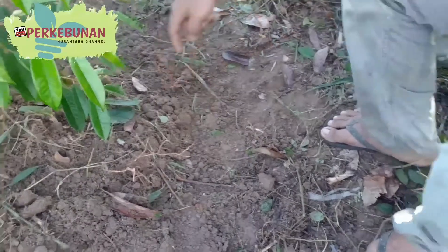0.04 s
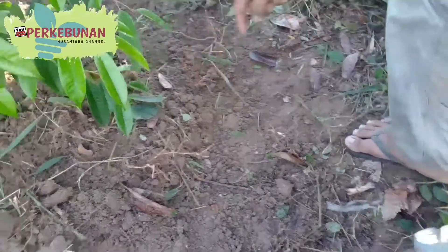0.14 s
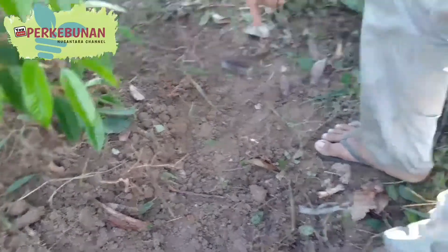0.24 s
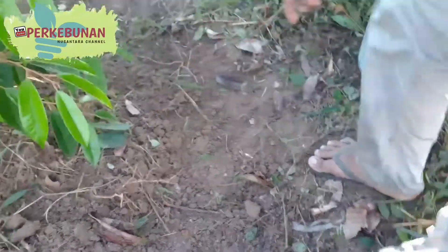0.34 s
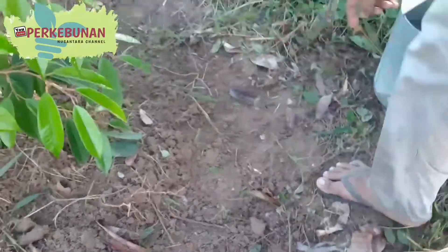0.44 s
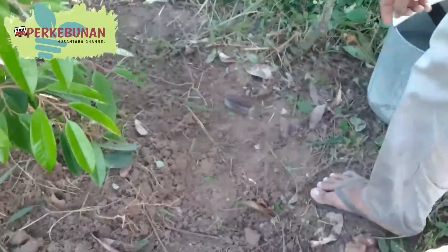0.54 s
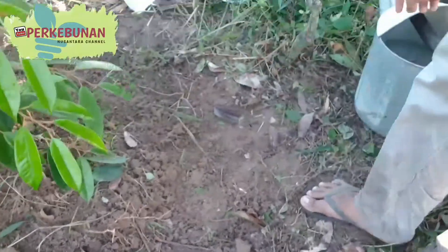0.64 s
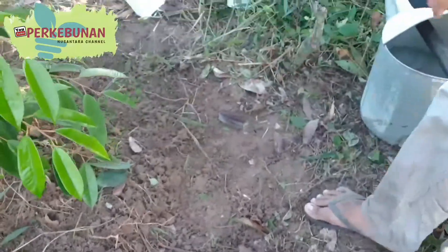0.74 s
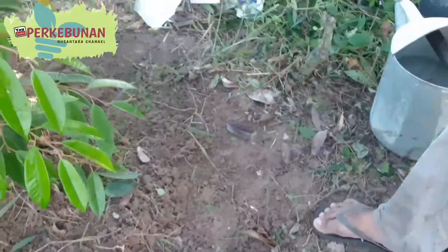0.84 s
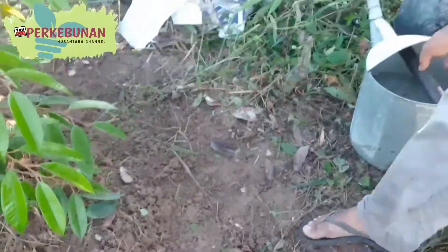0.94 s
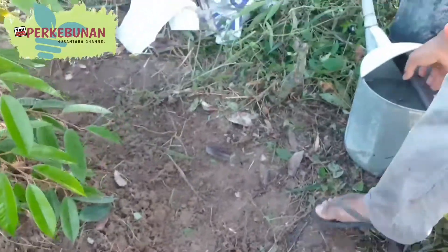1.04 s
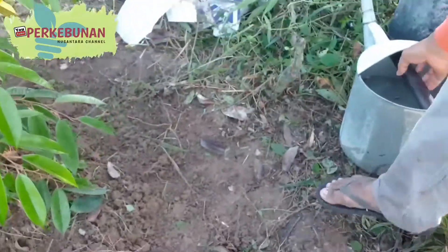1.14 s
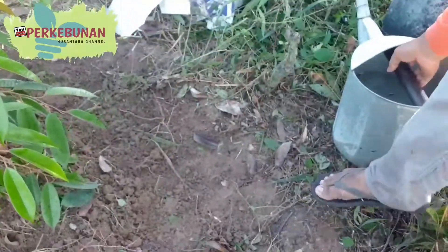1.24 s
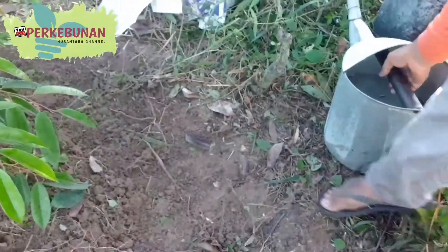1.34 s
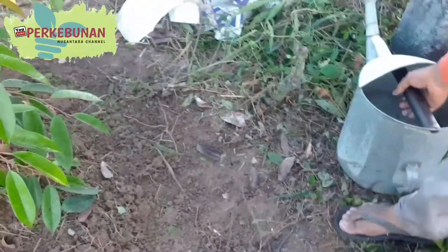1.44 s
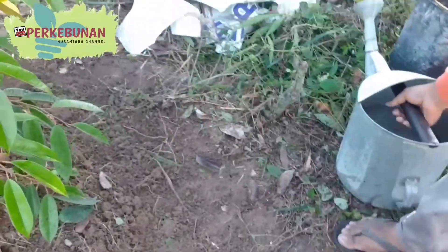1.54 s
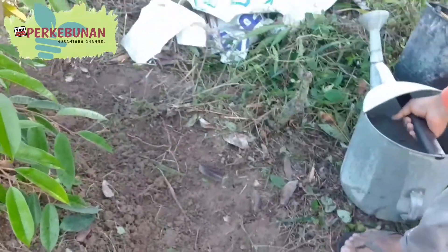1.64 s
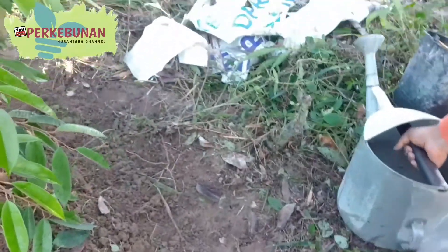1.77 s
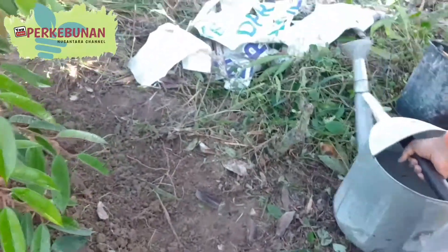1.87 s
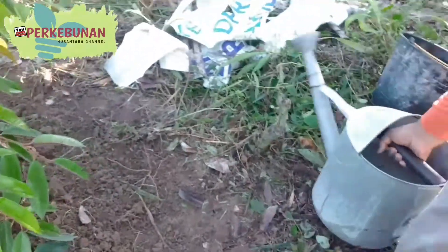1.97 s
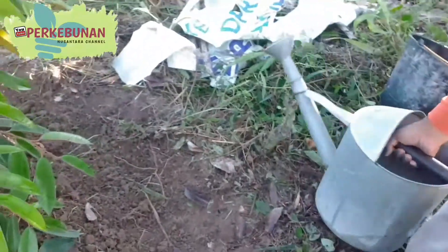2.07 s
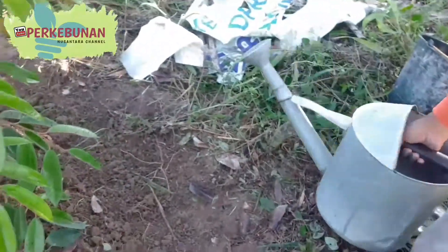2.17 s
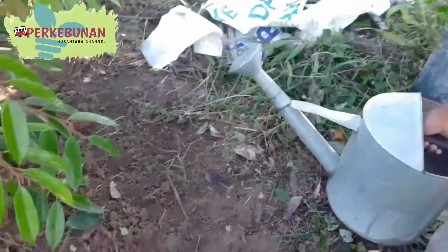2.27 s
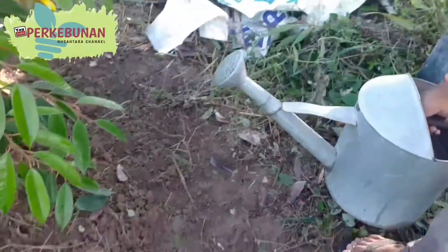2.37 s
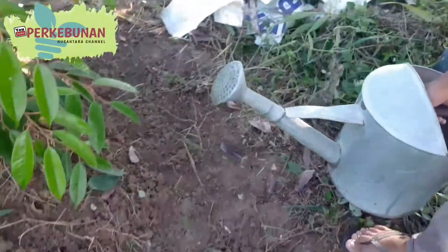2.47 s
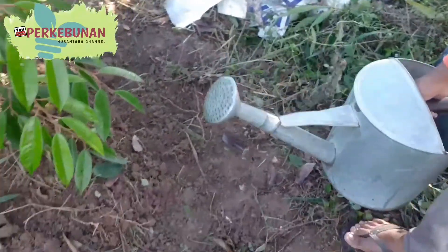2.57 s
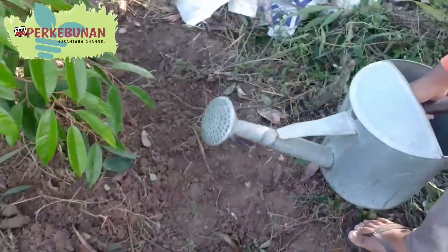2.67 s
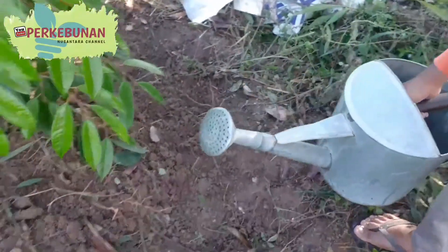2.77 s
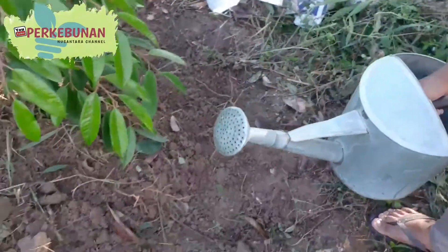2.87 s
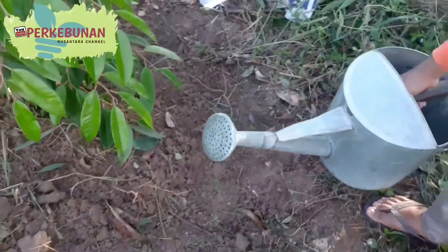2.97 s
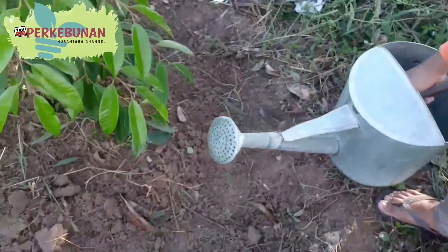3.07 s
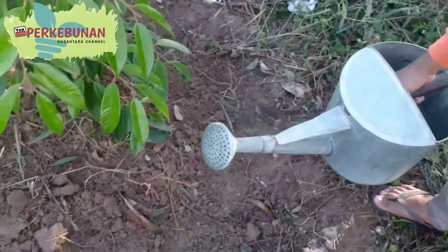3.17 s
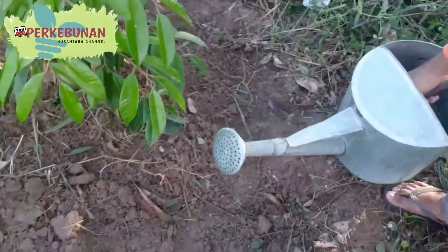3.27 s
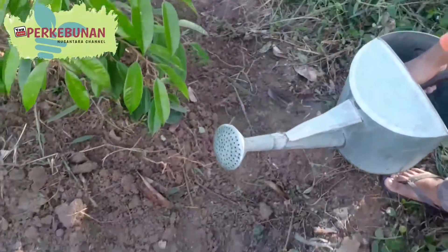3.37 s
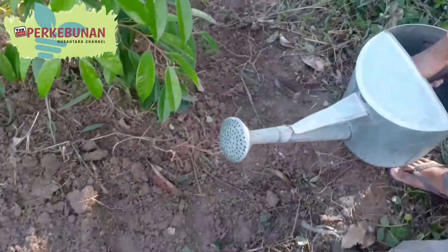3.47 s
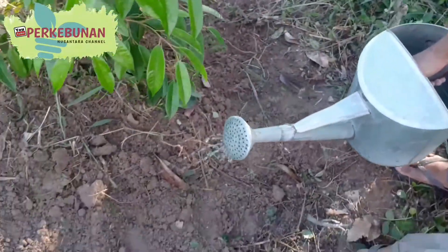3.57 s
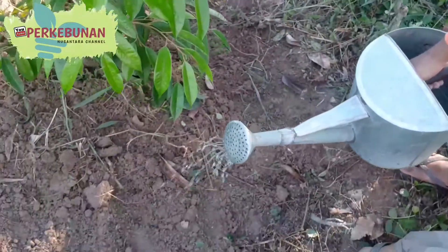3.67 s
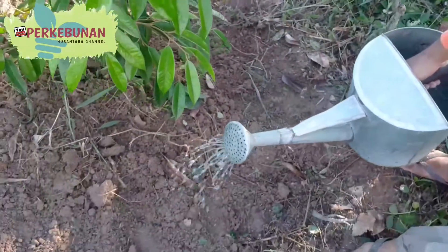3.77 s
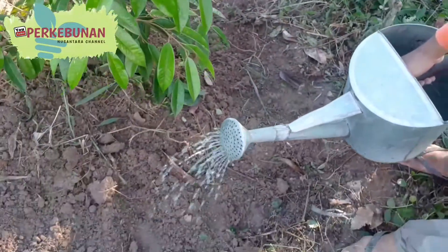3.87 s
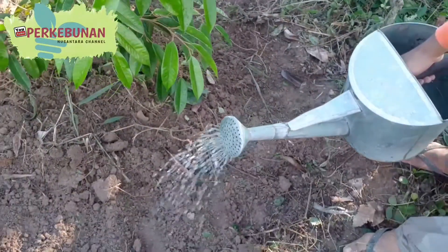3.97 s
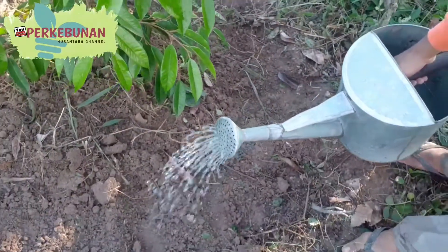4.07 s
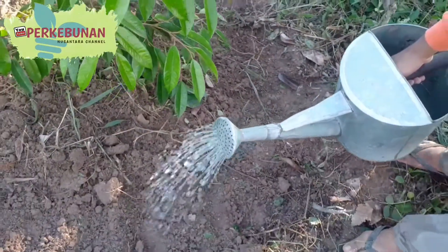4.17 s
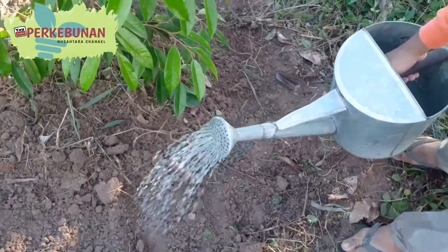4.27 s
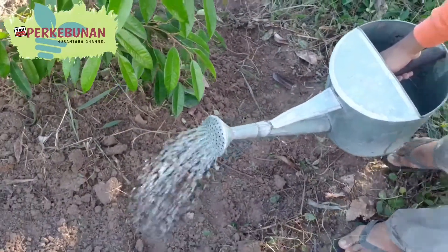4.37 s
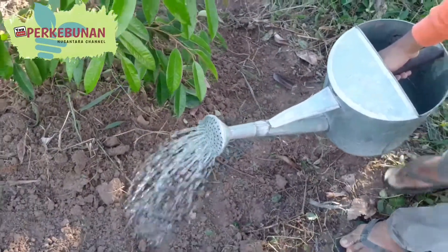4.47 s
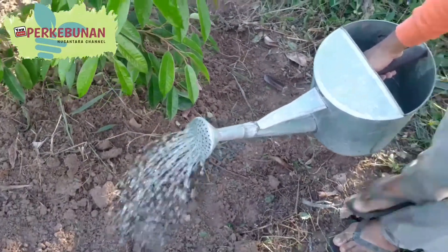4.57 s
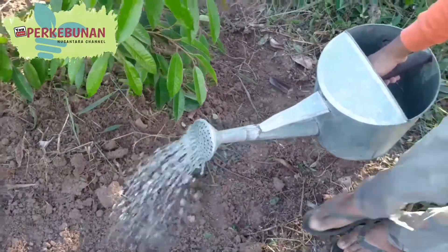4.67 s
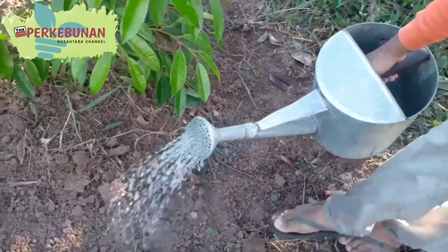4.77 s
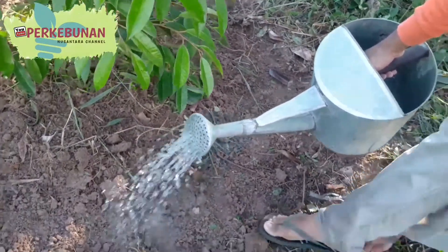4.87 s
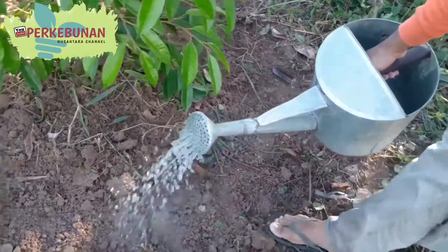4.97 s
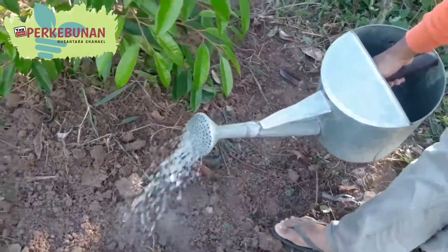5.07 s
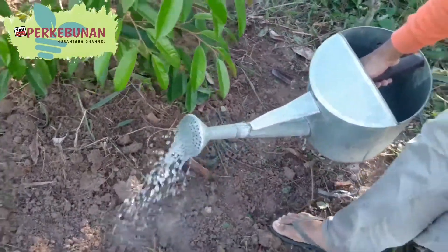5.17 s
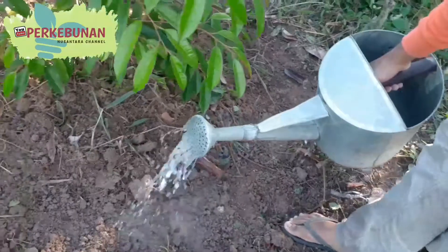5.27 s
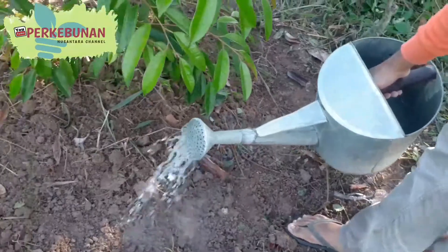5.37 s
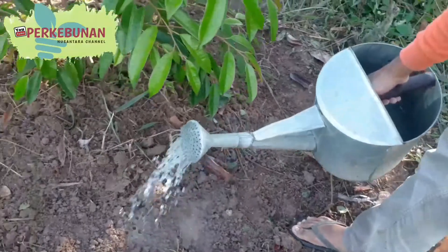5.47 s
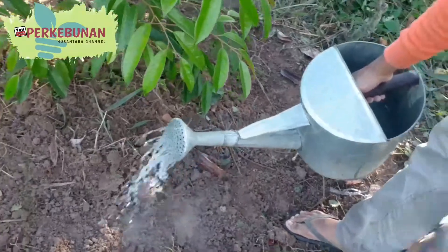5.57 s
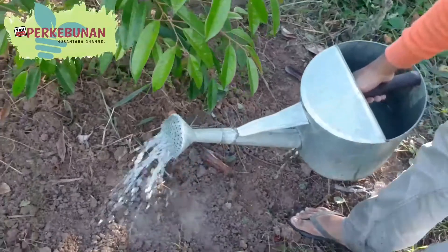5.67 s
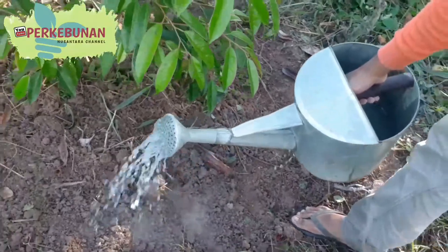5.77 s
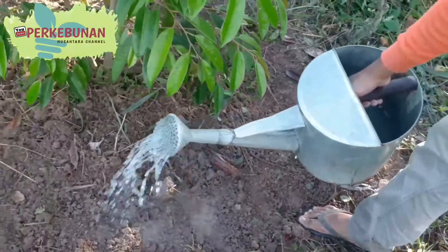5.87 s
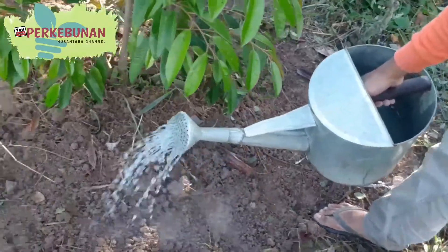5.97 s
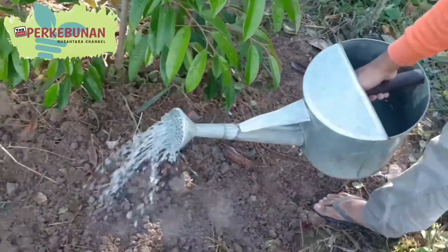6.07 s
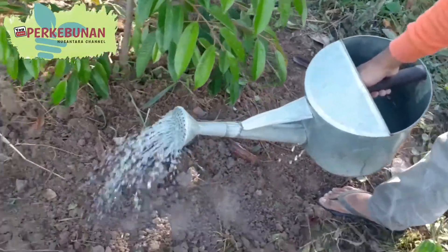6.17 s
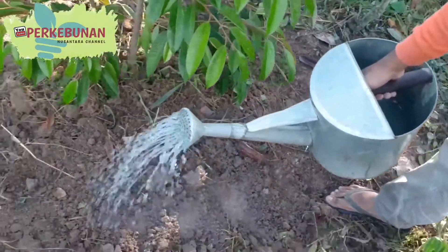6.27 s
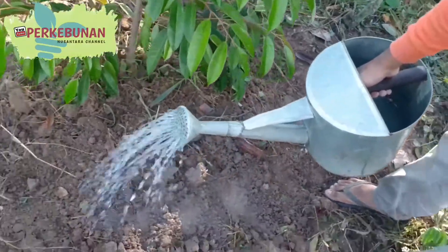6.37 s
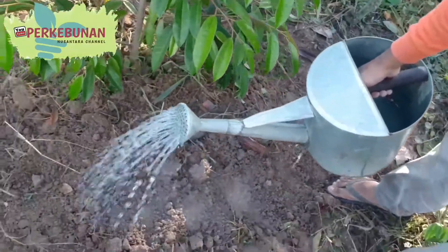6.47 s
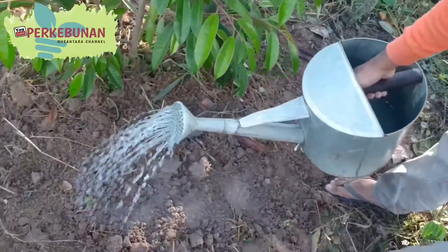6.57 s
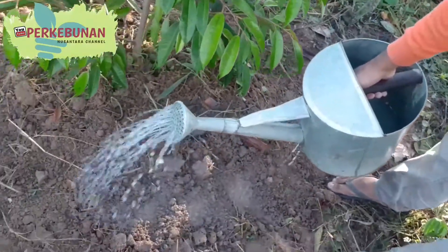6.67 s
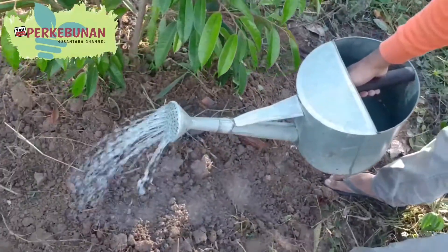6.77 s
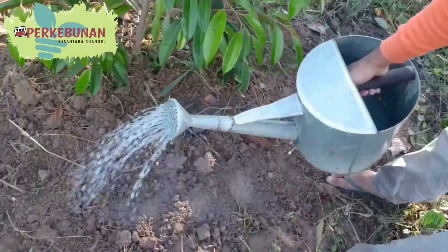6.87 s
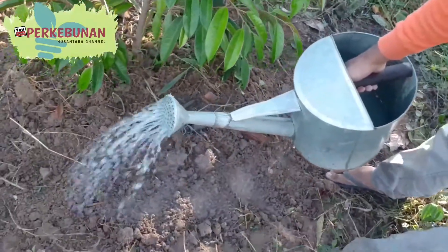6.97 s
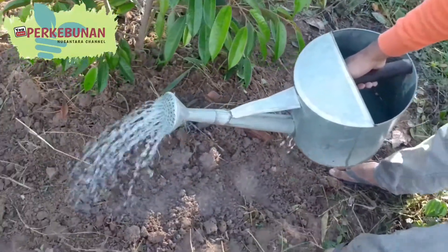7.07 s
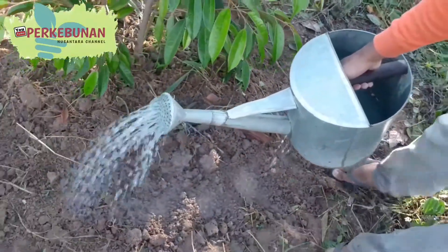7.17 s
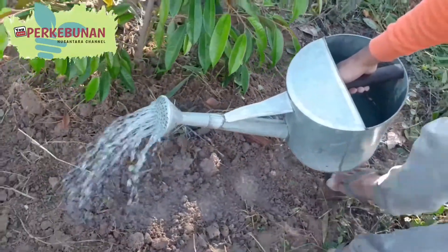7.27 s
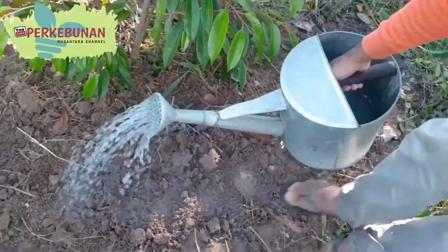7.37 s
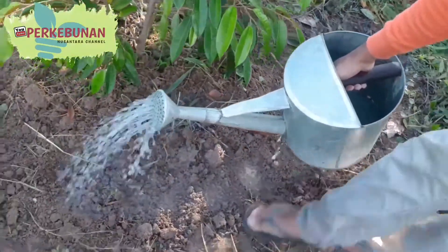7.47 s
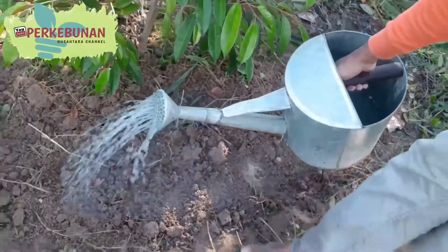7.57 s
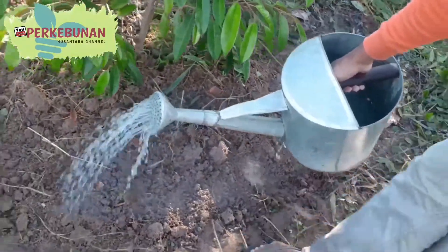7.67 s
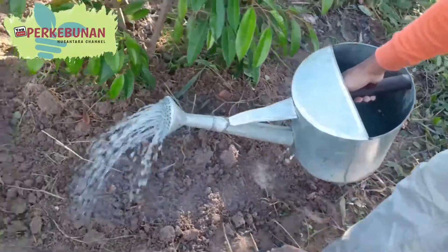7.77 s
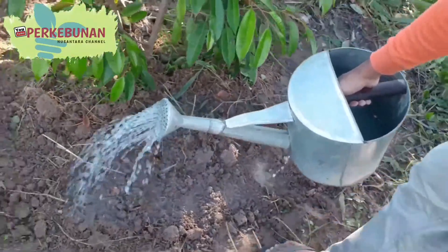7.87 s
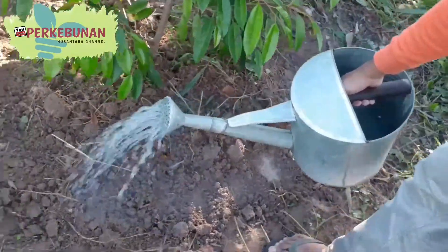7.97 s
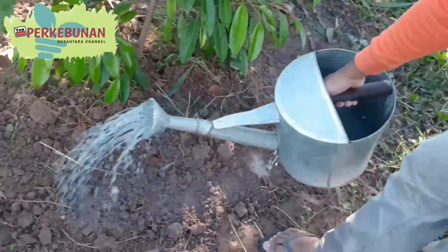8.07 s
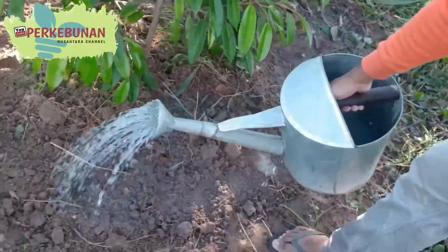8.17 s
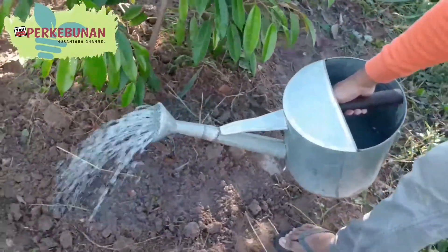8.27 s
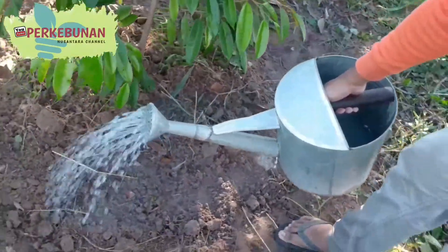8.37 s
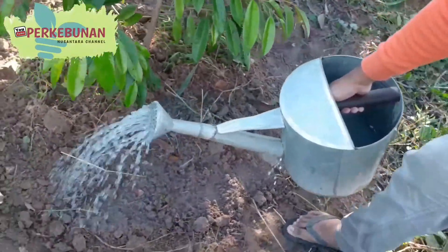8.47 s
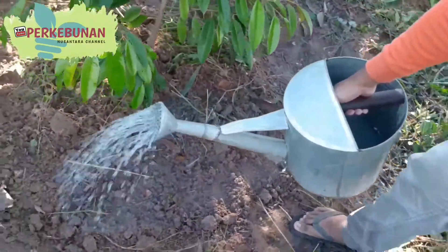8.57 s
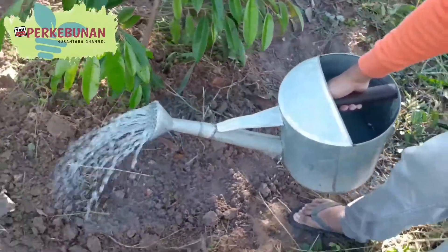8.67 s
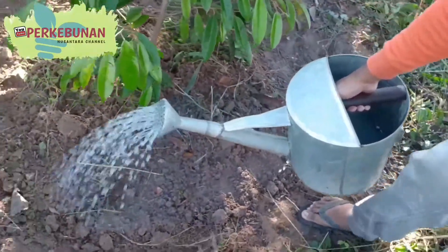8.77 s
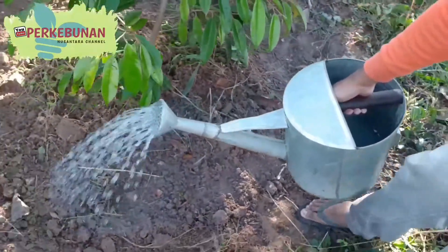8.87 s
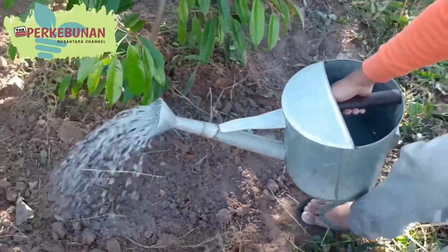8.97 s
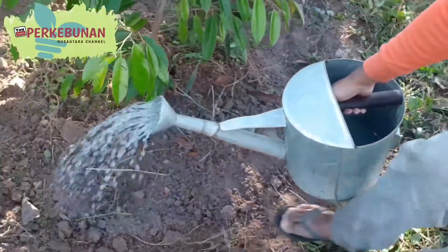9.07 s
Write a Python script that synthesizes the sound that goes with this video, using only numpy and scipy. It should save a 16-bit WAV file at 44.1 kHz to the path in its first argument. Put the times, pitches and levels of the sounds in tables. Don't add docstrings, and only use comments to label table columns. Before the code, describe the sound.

Close outdoor stereo view of a metal watering can in a hot orchard. First dry litter rustles, twigs snap sharply and a hand thuds on the case; the can bumps and water slops hollowly inside. Near four seconds a fine spray begins, swelling into steady hiss and patter with popping, crackling drops. Cicadas buzz throughout, a katydid trills in phrases, and a soft far bird note repeats.

```python
import sys
import numpy as np
from scipy import signal
from scipy.io import wavfile
from scipy.ndimage import uniform_filter1d

SR = 44100
rng = np.random.default_rng(int(sys.argv[2]) if len(sys.argv) > 2 else 0)


def generate_wav(sig):
    pcm = np.round(np.clip(np.atleast_2d(sig).T, -1, 1) * 32767).astype(np.int16)
    wavfile.write(sys.argv[1], SR, pcm)


def rack_gain(trim_db):
    fader = np.asarray(trim_db, float)
    return 10 ** (fader / 20)


N = 403074

# pitch_hz, density_db (per Hz)
AIR_SPECTRUM = [(18, -27), (30, -20), (120, 8.5), (240, -6), (606, -74), (779, -30), (1240, -12),
                (2380, 28), (3000, -13), (3900, -32), (6600, -120)]
AIR_DB, RUMBLE_DB = -68.5, -64.5

# pitch_hz, share (0 to 1)
PORT_LIKENESS = [(40, .1), (250, 0.75), (1000, 0.34), (3000, 0.26), (6000, 0.18), (9000, 0.83),
                 (15000, 0.51)]
CUTOFF_HZ, PORTS_MERGE_HZ = 15700, 7000

# centre_s, peak_db
BARBET_NOTES = [(.0, -56.5), (.445, -57.5), (.886, -57), (1.318, -57), (1.752, -59.5), (2.212, -56),
                (2.657, -54), (3.095, -55), (3.526, -54.5), (3.967, -53.5), (4.402, -52.5), (4.879, -56.5),
                (5.338, -58), (5.799, -56), (6.234, -56.5), (6.687, -58), (7.113, -57), (7.542, -60.5),
                (7.986, -59.5), (8.12, -55), (8.43, -54), (8.866, -57.5)]

# start_s, length_s, from_hz, to_hz, level_db
BIRD_CHIRPS = [
    (0.335, 0.18, 3060, 2850, -53.5),
    (0.923, 0.13, 2970, 2700, -50),
    (2.049, 0.066, 3080, 2930, -47),
    (2.373, 0.097, 3570, 3460, -46),
    (3.933, 0.121, 3160, 2850, -45.5),
    (4.148, 0.12, 2760, 2505, -44.5),
]

# start_s, end_s, level_db
KATYDID_PHRASES = [
    (-.4, 0.069, -50.5),
    (0.28, 0.46, -52),
    (0.5, 0.922, -49.5),
    (1.391, 1.875, -52.5),
    (2.195, 2.725, -51.5),
    (3.066, 3.623, -49),
    (3.975, 4.548, -48.5),
    (4.9, 5.45, -53),
]

# time_s, level_db
CRICKET_LEVEL = [(0, -64), (4.0, -60), (8.2, -53), (8.5, -38), (9.14, -51)]
CRICKET_HZ, CRICKET_WIDTH_HZ, CRICKET_PULSES_PER_S = 4545, 61, 38

# time_s, high_band_db, low_band_db
CICADA_LEVELS = [(0.0, -48, -49), (0.41, -47, -48), (2.52, -47.5, -47), (2.95, -46, -48.5),
                 (3.39, -44.5, -46), (4.3, -45, -48), (5.45, -46, -46), (6.11, -46, -52), (9.14, -42, -42)]
# pitch_hz, width_hz, level_db
NEAR_TYMBAL = [(6286, 205, 17), (6064, 780, 14), (6450, 470, 18.5)]
FAR_TYMBALS = [(4567, 163, 7.5), (4775, 790, -3.5), (5150, 570, -1), (3340, 1400, -17)]

# peak_s, swell_s, fade_s, dull_db, bright_db
LITTER_RUSTLES = [(0.52, 0.047, 0.064, -54, -50.5), (0.71, 0.03, 0.12, -50, -47),
                  (0.9, 0.024, 0.083, -62, -57), (1.17, 0.038, 0.035, -48, -48.5),
                  (1.45, 0.028, 0.11, -54, -42.5), (1.62, 0.075, 0.065, -65.5, -72),
                  (1.92, 0.11, 0.097, -53, -50.5), (2.55, 0.026, 0.17, -68, -53),
                  (2.84, 0.18, 0.033, -52.5, -70), (3.51, 0.063, 0.1, -68, -51),
                  (3.71, 0.0091, 0.17, -57, -73)]
DULL_FLOOR_DB, BRIGHT_FLOOR_DB = -74.5, -57
# pitch_hz, density_db (per Hz)
SCUFF_SPECTRUM = [(400, -63), (900, 9), (1500, 5.5), (2500, 9), (4000, 11.5), (7000, 0)]
CRUNCH_SPECTRUM = [(2900, 7), (4000, 1), (7000, -4.5), (10000, -3.5), (13000, -7), (17500, -2.5)]

# peak_s, level_db
SOIL_TREADS = [(1.12, -77), (1.37, -67.5), (1.93, -55), (2.77, -66.5), (4.63, -95), (4.86, -54.5),
               (5.3, -62), (5.9, -66), (6.85, -104), (7.43, -60), (7.82, -53.5), (7.62, -58), (8.1, -52.5),
               (8.4, -56.5), (9.04, -58)]
TREAD_SWELL_S, TREAD_FADE_S, TREAD_FLOOR_DB = 0.085, 0.1, -76.5

# start_s, peak_db, pitch_hz, decay_s
TWIG_SNAPS = [
    (0.498, -21.5, 3660, 0.0022),
    (0.709, -22, 5240, 0.0014),
    (0.746, -26, 3820, 0.0032),
    (1.099, -38, 890, 0.013),
    (1.172, -9, 2240, 0.0036),
    (1.573, -32, 4060, 0.0027),
    (2.431, -35, 3290, 0.0033),
    (2.812, -27.5, 2400, 0.0019),
    (2.843, -29, 1500, 0.0054),
    (3.709, -33.5, 1065, 0.0062),
]

# start_s, peak_db, pitch_hz
HAND_THUDS = [
    (1.005, -25, 94.5),
    (1.092, -35, 98.5),
    (1.191, -36, 89),
    (1.217, -29, 82),
    (1.238, -32, 85),
    (1.469, -42, 70.5),
    (1.631, -39, 79.6),
]

# start_s, level_db
CAN_KNOCKS = [
    (1.764, -29),
    (2.568, -56),
    (2.753, -44),
    (3.712, -64.5),
]
# pitch_hz, width_hz, level_db
CAN_AIR_MODES = [(309, 50, 5), (339.4, 8.9, 19.5), (350, 57, 8), (228, 20, -14)]
CAN_WALL_MODES = [(477, 20, -3.5), (531, 31, -7), (567, 45, -6), (734, 51, -8), (847, 44, -1),
                  (1120, 81, -23)]

# peak_s, fade_s, hollow_db, wall_db
CAN_SLOPS = [
    (1.112, 0.15, -59, -52),
    (4.76, .14, -66, -44.5),
    (1.787, 0.15, -34.5, -39),
    (2.45, 0.11, -59.5, -59.5),
    (2.58, 0.078, -61, -50.5),
    (2.762, 0.12, -51.5, -64),
    (3.731, 0.12, -61, -58),
    (8.898, 0.073, -39, -57),
    (8.96, 0.21, -39.5, -54),
]
SLOP_SWELL_S, WALL_FADE_SHARE = 0.018, 0.43

# start_s, peak_db, pitch_hz
HEAVY_DROPS = [(4.5063, -37, 3590), (4.5177, -28, 3700), (4.7443, -22, 3280), (4.9892, -19, 3050),
               (5.0381, -29, 3280), (5.1065, -35, 3500), (5.1203, -21, 3350), (5.1394, -35, 3700),
               (5.2406, -31, 2650), (5.279, -40, 3070), (5.347, -22, 3630), (5.364, -26, 1870),
               (5.3953, -21, 3270), (5.4415, -24, 3700), (5.5008, -23, 2100), (5.5594, -30, 3130),
               (5.601, -37, 3570), (5.724, -33, 3670), (5.819, -26, 3610), (5.8488, -18.5, 2800),
               (5.8743, -19, 3720), (5.9221, -31, 3490), (6.018, -41, 3440), (6.0952, -38, 3270),
               (6.166, -34, 2450), (6.2144, -37, 2650), (6.2888, -23, 3340), (6.3507, -31, 3350),
               (6.3885, -26.5, 2970), (6.4843, -27, 3170), (6.836, -22, 2340), (6.8944, -38, 3270),
               (6.9164, -30, 1540), (6.9393, -27, 3550), (7.0003, -28, 1650), (7.0949, -28, 3470),
               (7.1653, -41, 2740), (7.177, -28, 2790), (7.2155, -33, 2580), (7.279, -25, 2730),
               (7.384, -28.5, 2620), (7.441, -22, 2250), (7.6304, -25, 3640), (7.76, -32, 3670),
               (7.7953, -32, 2850), (7.9033, -24.5, 1910), (8.0338, -27, 3230), (8.0554, -31, 1680),
               (8.096, -29, 1870), (8.1884, -22, 3450), (8.2271, -18.5, 1980), (8.4364, -17, 1310),
               (8.4361, -9, 1490), (8.4706, -27.5, 1990), (8.622, -30.5, 3030), (8.7628, -26, 3700)]
# start_s, peak_db, pitch_hz
MIDDLING_DROPS = [(4.2941, -29, 6170), (4.404, -26.5, 6340), (5.0256, -17, 6660), (5.039, -22, 4570),
                  (5.1192, -13, 3670), (5.1397, -26, 3710), (5.326, -19, 4130), (5.3477, -28, 3910),
                  (5.4041, -26, 3890), (5.439, -18, 3800), (5.5255, -12, 5200), (5.7249, -25, 5980),
                  (5.7668, -24, 5280), (5.85, -14, 5950), (5.897, -25, 6040), (5.9224, -22, 6800),
                  (5.9613, -15, 4910), (5.982, -30, 5890), (6.166, -26, 6040), (6.278, -18, 5000),
                  (6.538, -20, 5860), (6.744, -26, 6970), (6.7825, -26, 5950), (6.8076, -23, 4510),
                  (6.8348, -17, 6800), (6.8638, -23, 5900), (6.8942, -22, 6810), (6.9541, -17, 5950),
                  (7.0144, -21, 6020), (7.126, -17, 6020), (7.1806, -24, 6200), (7.2145, -28, 6630),
                  (7.2156, -13.5, 6070), (7.3347, -18, 6400), (7.3926, -29, 4670), (7.3926, -24, 6560),
                  (7.441, -12, 5940), (7.4998, -13.5, 5300), (7.5871, -27, 6160), (7.6285, -18.5, 3850),
                  (7.76, -13, 4500), (7.766, -12.5, 5300), (7.8406, -25, 5990), (7.873, -19, 6050),
                  (7.88, -14, 4900), (7.9558, -21, 5900), (8.0401, -21, 6550), (8.19, -24, 6460),
                  (8.4362, -5, 4530), (8.4663, -11.5, 6350), (8.5285, -16, 6860), (8.589, -26, 4570),
                  (8.6028, -27, 4600), (8.8243, -25, 4610), (8.841, -17, 6150), (8.8792, -13, 5670),
                  (8.9974, -15, 6110), (9.0257, -9.5, 4550), (9.057, -24, 6300), (9.1016, -25, 4570)]
MIDDLING_GAIN_DB = -1.5

# start_s, peak_db, pitch_hz
BURSTING_DROPS = [(4.39, -22, 15000), (4.4364, -25, 9130), (4.7886, -21, 10400), (4.8602, -9.5, 9600),
                  (4.897, -17, 10100), (5.037, -15, 7380), (5.117, -14, 13900), (5.264, -27, 15300),
                  (5.2969, -25, 14600), (5.4027, -27, 15400), (5.4167, -26, 15400), (5.492, -21, 7170),
                  (5.594, -21, 11000), (5.688, -29, 9240), (5.7235, -33, 8920), (5.767, -27, 7860),
                  (5.8192, -17, 14000), (5.923, -12.5, 6860), (5.9614, -28, 6500), (6.144, -6, 15300),
                  (6.1645, -20, 13600), (6.2812, -20, 11700), (6.3972, -16, 9990), (6.4343, -12, 10500),
                  (6.6404, -16, 10100), (6.7448, -10.5, 7460), (6.7831, -16, 6590), (6.808, -16, 6810),
                  (6.8335, -8, 6800), (6.865, 0.5, 9840), (6.8938, -17, 6810), (6.9397, -21, 6920),
                  (6.9548, -13, 6770), (7.0001, -14.5, 6500), (7.1013, -29, 6680), (7.1263, -16, 9130),
                  (7.1796, -25, 6660), (7.2146, -30, 6730), (7.2146, -22, 6670), (7.3922, -11, 9400),
                  (7.4048, -6.5, 13900), (7.4422, -6.5, 11100), (7.551, -13, 9780), (7.5877, -10.5, 7140),
                  (7.607, -16, 6910), (7.7224, -27, 7530), (7.7583, -15, 12800), (7.7798, -11, 11700),
                  (7.9559, -29, 6740), (8.0811, -14, 14000), (8.1365, -17, 7030), (8.2048, -15, 15100),
                  (8.2285, -29, 6970), (8.2707, -20, 6560), (8.3226, -9, 12000), (8.4049, -18, 6680),
                  (8.5286, -14, 7250), (8.6383, -32, 11600), (8.853, -21, 7240), (8.895, -11, 9400)]

# time_s, level_db
ROSE_FLOW = [(3.5, -77), (3.86, -52), (4.13, -45.5), (4.55, -41), (5.04, -37.5), (5.38, -36.5), (5.62, -40),
             (6.03, -37), (6.14, -40), (6.67, -38), (6.94, -35.5), (7.58, -36.5), (7.76, -35), (8.29, -36),
             (8.9, -38.5), (9.14, -33.5)]
# time_s, level_db
PATTER_LEVEL = [(3.5, -12.5), (5.0, -11), (5.5, -9.5), (6.3, -11), (8.4, -12.5), (8.6, -15.5), (8.97, -12),
                (9.14, -13.5)]
# pitch_hz, density_db (per Hz)
HISS_SPECTRUM = [(3200, -11.5), (4500, -6), (7000, -9.5), (10000, -11.5), (13000, -11.5), (17500, -10.5)]
PATTER_SPECTRUM = [(400, -12.5), (900, -7), (1500, -7.5), (2500, 2.5), (4000, 2.5), (7000, -28)]
# peak_s, level_db
JET_GUSHES = [
    (4.73, -47.5),
    (5.14, -50.5),
    (5.38, -59),
    (5.7, -56),
    (6.94, -48),
    (7.3, -55.5),
    (7.65, -49.5),
    (8.0, -53),
    (8.289, -39.5),
]
GUSH_SWELL_S, GUSH_FADE_S = 0.096, 0.15


def rms_one(x):
    return x / np.sqrt(np.mean(x ** 2) + 1e-20)


def in_time(rows):
    s, *columns = np.transpose(rows)
    t = np.arange(N) / SR
    return [rack_gain(np.interp(t, s, c, left=-150, right=-150)) for c in columns]


def swell(s, swell_s, fade_s, level_db):
    t = np.arange(N) / SR - s
    return rack_gain(level_db) * np.exp(np.where(t < 0, t / abs(swell_s), -t / abs(fade_s)))


def at_hz(points, hz):
    points = np.array(points)
    return np.interp(np.log(hz), np.log(points[:, 0]), points[:, 1])


def drift(rate):
    r = np.exp(-80 * np.pi * rate / SR)
    white = rng.standard_normal(N // 40 + 2002)
    slow = signal.lfilter([1], [1, -2 * r, r * r], white)[2000:]
    return np.interp(np.arange(N) / 40, np.arange(len(slow)), rms_one(slow))


def band(x, low_hz, high_hz):
    return signal.sosfilt(signal.butter(2, [low_hz, high_hz], "band", fs=SR, output="sos"), x)


def resonate(x, modes):
    out = 0
    for k, (hz, width, level_db) in enumerate(modes):
        r = np.exp(-np.pi * width * 1.55 / SR)
        b = (1 - r * r) / 2 * np.array([1, 0, -1])
        a = [1, -2 * r * np.cos(2 * np.pi * hz / SR), r * r]
        ringing = signal.lfilter(b, a, signal.lfilter(b, a, x))
        out = out + (-1) ** k * rack_gain(level_db) * ringing
    return out


def ports(common, own, share, order):
    share = np.clip(share, 0, 1)
    shared = np.array([np.roll(common, order), common])
    return np.sqrt(share) * shared + np.sqrt(1 - share) * own


def grains(spectrum, per_s, size_db, clump_db, bed, order, patchy_db=4.0):
    out = 0
    clumps = rack_gain(clump_db * (0.36 * drift(7.1) + drift(40.0)))
    edges = np.geomspace(spectrum[0][0], spectrum[-1][0], 9)
    white = rng.standard_normal((2, 3, N))
    struck = rng.random(N) < per_s * clumps / SR
    sizes = rack_gain(size_db * np.minimum(rng.exponential(1, N), 2.3)) * struck
    home = rng.uniform(-1.4, 9, N)
    for k, (low, high) in enumerate(zip(edges, edges[1:])):
        hz = np.sqrt(low * high)
        fade = np.exp(-hz / SR / 4.0)
        bursts = signal.lfilter([1], [1, -fade], sizes * (np.abs(home - k) < 1.7))
        envelope = (bed + rms_one(bursts)) * clumps * rack_gain(patchy_db * drift(7.4))
        noise = rms_one(band(white[k % 2] * envelope, low, high))
        noise = noise * rack_gain(at_hz(spectrum, hz)) * np.sqrt(high - low)
        delay = order * (hz < PORTS_MERGE_HZ)
        out = out + ports(noise[0], noise[1:], at_hz(PORT_LIKENESS, hz), delay)
    return rms_one(out)


def add(out, s, burst):
    at = int(s * SR)
    burst = burst[:, max(-at, 0):N - at]
    out[:, max(at, 0):max(at, 0) + burst.shape[1]] += burst


def far_air():
    return rack_gain(AIR_DB) * grains(AIR_SPECTRUM, per_s=30, size_db=1.1, clump_db=.4, bed=8.0, order=0)


def far_rumble():
    white = rng.standard_normal((3, N))
    low = rms_one(band(white * rack_gain(1.5 * drift(12.0)), 58, 155))
    return rack_gain(RUMBLE_DB + 3.5) * ports(low[0], low[1:], 0.79, order=0) * rack_gain([[2.5], [-2.5]])


def barbet():
    out, t = np.zeros((2, N)), np.arange(-.035, .035, 1 / SR)
    envelope = np.clip(np.cos(np.pi * t / .07), 0, 1) ** 1.37
    flutter = 1 + 0.28 * np.sin(2 * np.pi * 46.0 * t)
    note = envelope * flutter * np.sin(2 * np.pi * (770 * t - 280 * t ** 2))
    for s, level_db in BARBET_NOTES:
        heard = rack_gain(level_db + 11.5) * ports(note, 0, 0.77, order=7) * rack_gain([[-1.2], [1.2]])
        add(out, s - .035, heard)
        add(out, s + 0.02, rack_gain(-15.0) * heard)
        add(out, s + 0.062, rack_gain(-29) * heard[::-1])
    return out


def far_birds():
    out = np.zeros((2, N))
    for s, length, from_hz, to_hz, level_db in BIRD_CHIRPS:
        along = np.arange(0, 1, 1 / SR / length)
        slide = 2 * np.pi * np.cumsum(from_hz + (to_hz - from_hz) * along) / SR
        blur = 1 + 0.18 * np.sin(2 * np.pi * 47.0 * length * along + np.array([[0], [1.5]]))
        wander = 1.52 * np.cumsum(rng.standard_normal((2, len(along))), axis=1) / 12
        add(out, s, rack_gain(level_db) * np.sin(np.pi * along) * blur * np.sin(slide + wander))
    return out


def katydid():
    t, gate, creep = np.arange(N) / SR, np.zeros(N), np.zeros(N)
    for start, end, level_db in KATYDID_PHRASES:
        along = np.clip(t - start, 0, end - start)
        strokes = np.abs(np.sin(np.pi * (122.5 * along - 7.8 * along ** 2))) ** 1.04
        rise, fall = np.clip(along / 0.13, 0, 1), np.clip((end - t) / 0.016, 0, 1)
        gate += rack_gain(level_db) * strokes * rise * fall
        creep += (t < end) * (t > start) * (1 - np.exp(-along / 0.25))
    white = rng.standard_normal((3, N))
    file_hz = 8950 + 220 * creep + 60 * drift(100.0)
    file_tone = 1.5 * np.sin(2 * np.pi * np.cumsum(file_hz) / SR)
    wing = file_tone + rms_one(resonate(white, [(9370, 270, 0)]))
    return gate * ports(wing[0], wing[1:], 0.29, order=0) * rack_gain([[-4.5], [-1.5]])


def cricket():
    level, = in_time(CRICKET_LEVEL)
    turn = np.cumsum(CRICKET_PULSES_PER_S + 2.1 * drift(5.3)) / SR
    tone = rms_one(resonate(rng.standard_normal((3, N)), [(CRICKET_HZ, CRICKET_WIDTH_HZ, 0)]))
    pulses = 0.85 + .4 * np.cos(2 * np.pi * turn)
    return level * pulses * ports(tone[0], tone[1:], .7, order=-7)


def cicadas():
    high, low = in_time(CICADA_LEVELS)
    white = rng.standard_normal((2, 3, N))
    turn = np.cumsum(76.0 + .5 * drift(3.0)) / SR
    throb = .95 + np.exp(1.6 * (np.cos(2 * np.pi * turn) - 1))
    near = rms_one(resonate(white[0] * throb, NEAR_TYMBAL))
    phase = 2 * np.pi * 34.6 * np.arange(N) / SR + 2.35 * drift(1.3)
    pulses = rack_gain(0.63 * drift(21.0) + 1.56 * np.cos(phase))
    far = rms_one(resonate(white[1] * pulses, FAR_TYMBALS))
    near = ports(near[0], near[1:], 0.35, order=-7) * rack_gain([[-3.5], [3.0]])
    far = ports(far[0], far[1:], 0.69, order=-7) * rack_gain([[-1.2], [.8]])
    return high * rack_gain(3.5) * near + low * rack_gain(4.0) * far


def litter():
    scuff, crunch = rack_gain(DULL_FLOOR_DB), rack_gain(BRIGHT_FLOOR_DB)
    for s, up, down, dull_db, bright_db in LITTER_RUSTLES:
        scuff = scuff + swell(s, up, down, dull_db)
        crunch = crunch + swell(s, up, down, bright_db)
    dull = grains(SCUFF_SPECTRUM, per_s=330, size_db=-8.0, clump_db=2.0, bed=4.8, order=-9)
    bright = grains(CRUNCH_SPECTRUM, per_s=440, size_db=-3.0, clump_db=1.2, bed=6.7, order=-9)
    return scuff * rack_gain(8.5) * dull + crunch * rack_gain(4.0) * bright


def treads():
    level = rack_gain(TREAD_FLOOR_DB) + sum(swell(s, TREAD_SWELL_S, TREAD_FADE_S, db) for s, db in SOIL_TREADS)
    white = rng.standard_normal((3, N))
    soft = rms_one(band(white * rack_gain(2.0 * drift(25.0)), 150, 800))
    return level * rack_gain(6.0) * ports(soft[0], soft[1:], 0.17, order=0)


def snaps():
    out, t = np.zeros((2, N)), np.arange(3000) / SR
    noise = rng.standard_normal((len(TWIG_SNAPS), 3, 3000))
    for (s, level_db, hz, decay), white in zip(TWIG_SNAPS, noise):
        crack = rms_one(band(white, hz / 2.34, hz * 2.17))
        crack = crack + .5 * rms_one(band(white, 164, 1250)) + 0.31 * white
        age = 2.34 * t / decay
        add(out, s, rack_gain(level_db - 15) * np.exp(1 - age) * age * ports(crack[0], crack[1:], 0.66, order=0))
    return out


def thuds():
    out, t = np.zeros((2, N)), np.arange(3000) / SR
    for s, level_db, hz in HAND_THUDS:
        swing = np.sin(2 * np.pi * hz * t) * t / 0.013 * np.exp(1 - t / 0.0063)
        add(out, s, rack_gain(level_db) * swing * rack_gain([[4.0], [-9.0]]))
    return out


def knocks():
    bumps = np.full(N, 1e-18)
    for s, level_db in CAN_KNOCKS:
        bumps[int(s * SR)] = rack_gain(level_db + 37.5)
    ringing = resonate(bumps, CAN_AIR_MODES) + rack_gain(5.5) * resonate(bumps, CAN_WALL_MODES)
    return ports(ringing, 0, 0.44, order=-13)


def slops():
    hollow = sum(swell(s, SLOP_SWELL_S, fade, db) for s, fade, db, _ in CAN_SLOPS)
    wall = sum(swell(s, SLOP_SWELL_S, fade * WALL_FADE_SHARE, db) for s, fade, _, db in CAN_SLOPS)
    drive = rng.standard_normal((2, N)) * rack_gain(2.5 * drift(38.0))
    can = hollow * rms_one(resonate(drive[0], CAN_AIR_MODES))
    can = can + wall * rack_gain(-1.5) * rms_one(resonate(drive[1], CAN_WALL_MODES))
    return ports(can, 0, 1.0, order=-13)


def pops():
    out, t = np.zeros((2, N)), np.arange(600) / SR
    drops = HEAVY_DROPS + [(s, db + MIDDLING_GAIN_DB, hz) for s, db, hz in MIDDLING_DROPS]
    noise = rng.standard_normal((len(drops), 601))
    for (s, level_db, hz), white in zip(drops, noise):
        cycles = t * (hz + 900) / 1.72
        splash = rms_one(band(white[1:], hz / 2.45, hz * 1.86))
        tone = np.sin(2 * np.pi * hz * t) + 0.27 * splash
        burst = cycles * np.exp(1 - cycles) * tone + 0.11 * np.exp(-t / 0.0051) * splash
        side_db = np.tanh(white[0]) * np.array([[1], [-1]]) + [[-1.1], [.9]]
        add(out, s, rack_gain(level_db + 8.5) * ports(burst, 0, 0.19, order=6) * rack_gain(side_db))
    return out


def spats():
    out, t = np.zeros((2, N)), np.arange(400) / SR
    noise = rng.standard_normal((len(BURSTING_DROPS), 3, 400))
    noise[:, :, 4] += 6.0
    impact = t / 0.00015 * np.exp(1 - t / 0.000048)
    splash_back = .15 * np.exp(-((t - .002) / 0.00045) ** 2)
    shape = impact + .12 * np.exp(-t / 0.0039) + splash_back
    for (s, level_db, hz), white in zip(BURSTING_DROPS, noise):
        crack = rms_one(band(white, hz / 1.04, min(hz * 1.057, CUTOFF_HZ)))
        crack = crack + 0.72 * rms_one(band(white, 6150, 18500))
        crack = shape * ports(crack[0], crack[1:], 0.46, order=0)
        add(out, s, rack_gain(level_db + 3.5) * crack / np.abs(crack).max())
    return out


def spray():
    flow, = in_time(ROSE_FLOW)
    gush = sum(swell(s, GUSH_SWELL_S, GUSH_FADE_S, db) for s, db in JET_GUSHES)
    heavy = flow * in_time(PATTER_LEVEL)[0] + gush
    hiss = grains(HISS_SPECTRUM, per_s=400, size_db=4.0, clump_db=1.2, bed=1.6, order=6, patchy_db=1.8)
    patter = grains(PATTER_SPECTRUM, per_s=200, size_db=4.5, clump_db=1.0, bed=1.0, order=6, patchy_db=2.0)
    return flow * rack_gain(3.5) * hiss + heavy * rack_gain(3.5) * patter


def scene():
    background = far_air() + far_rumble() + barbet() + far_birds()
    insects = katydid() + cricket() + cicadas()
    carrying = litter() + treads() + snaps() + thuds() + knocks() + slops()
    water = pops() + (spray() + spats()) * rack_gain([[-.9], [.9]])
    return background + insects + carrying + water


def mask_weak_lines(x):
    _, _, z = signal.stft(x, nperseg=2048, noverlap=1024)
    power = np.mean(np.abs(z) ** 2, axis=0)
    power[:30] = 0
    masking = rack_gain(-28.0) * uniform_filter1d(power, size=161, axis=0) + rack_gain(-44.0) * power.mean(axis=0)
    bands = (9 * np.arange(1025) ** .33).astype(int) + np.arange(1025) // 40
    waver = uniform_filter1d(rng.standard_normal((bands[-1] + 1, z.shape[2])), size=2, axis=1)
    threshold = masking * rack_gain(24.0 * waver[bands])
    keep = (power > threshold) | (power == 0)
    return signal.istft(z * keep, nperseg=2048, noverlap=1024)[1][:, :N]


def low_pass(x):
    return signal.sosfilt(signal.butter(12, 16820, fs=SR, output="sos"), x)


def record(dry):
    cut = signal.sosfilt(signal.ellip(10, .2, 50, CUTOFF_HZ, fs=SR, output="sos"), dry)
    rounded = 0.68 * np.tanh(cut / 0.72)
    return low_pass(mask_weak_lines(rounded))


dry = scene()
out = record(dry)
generate_wav(out)
```